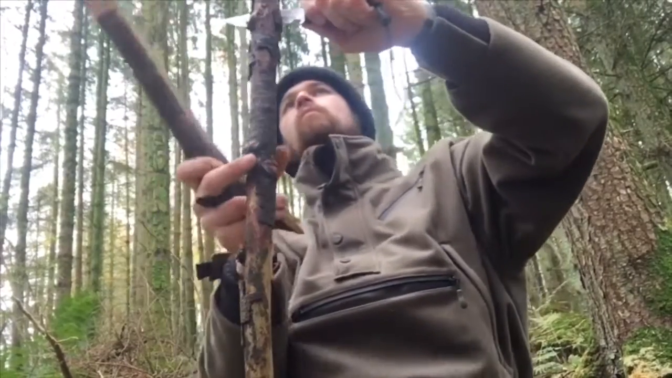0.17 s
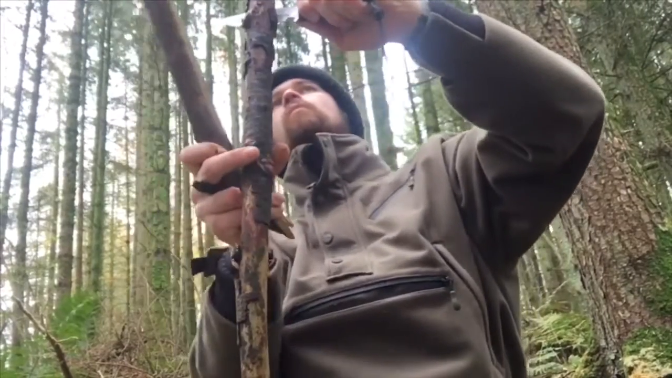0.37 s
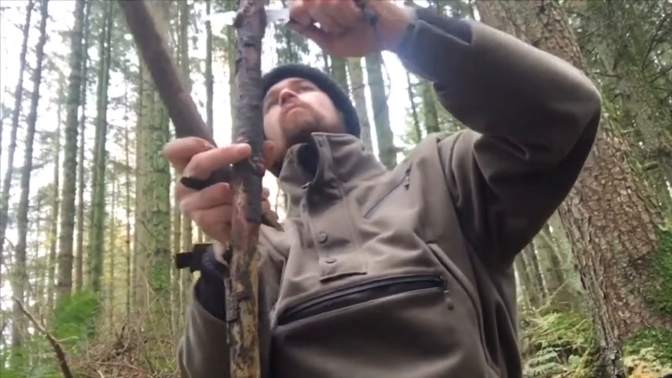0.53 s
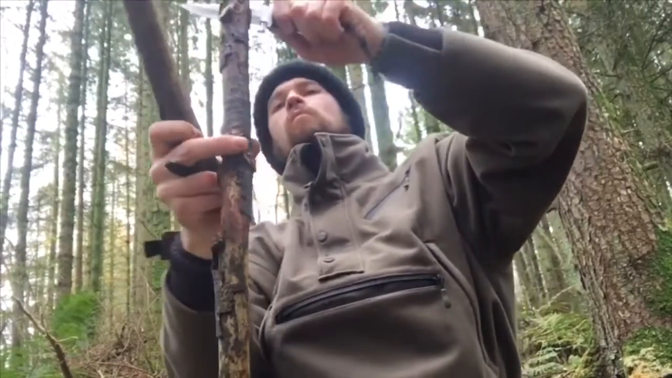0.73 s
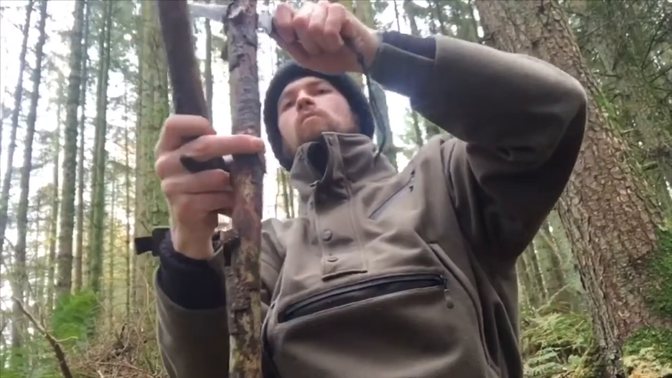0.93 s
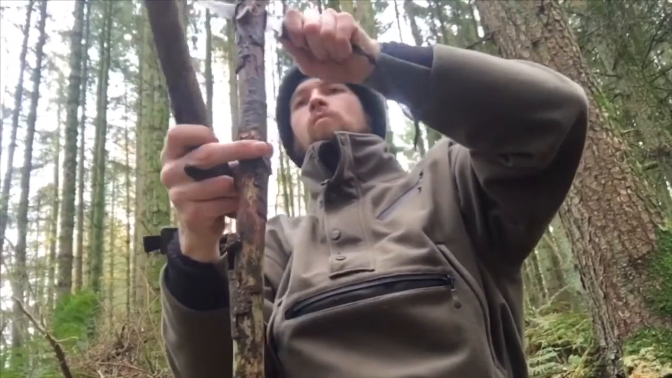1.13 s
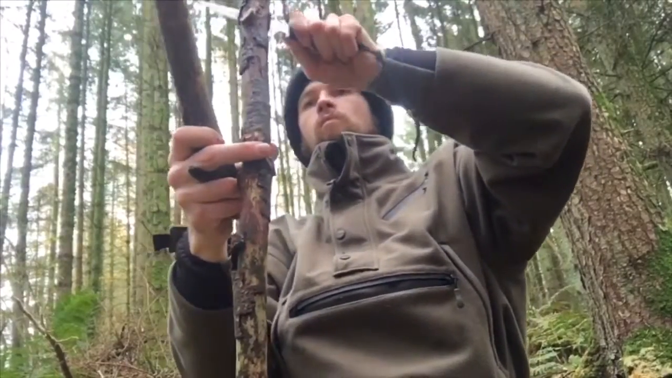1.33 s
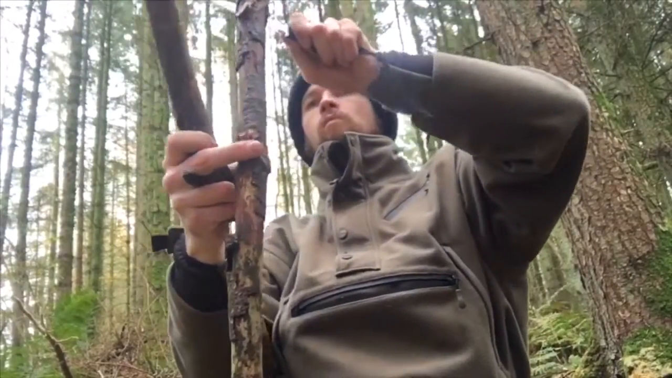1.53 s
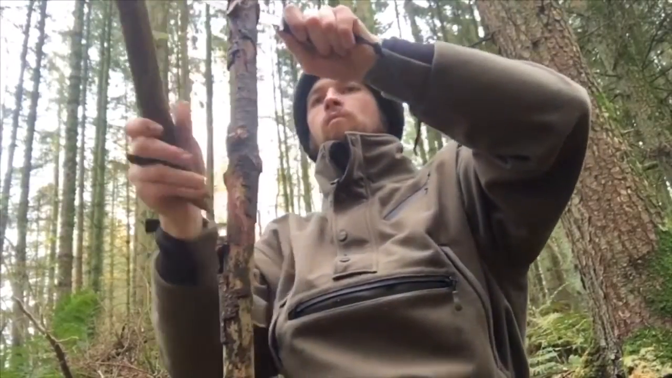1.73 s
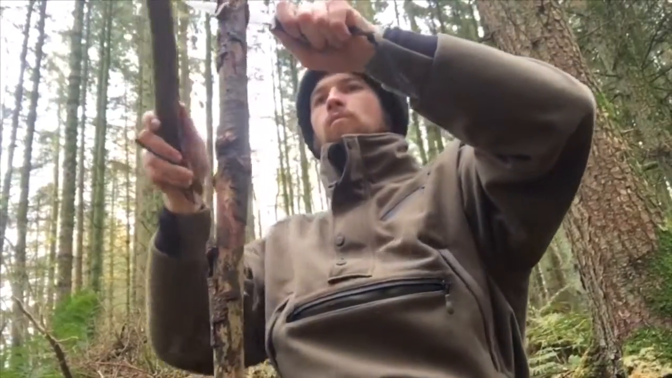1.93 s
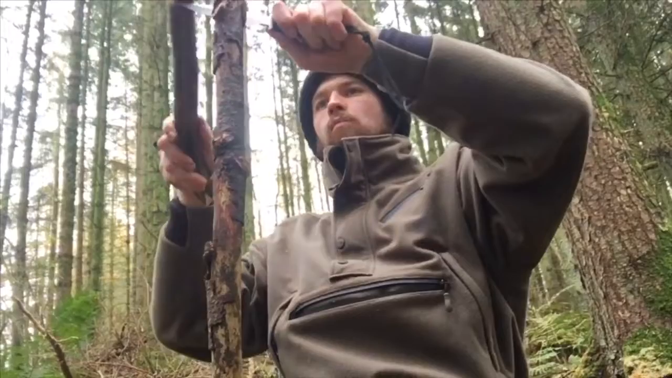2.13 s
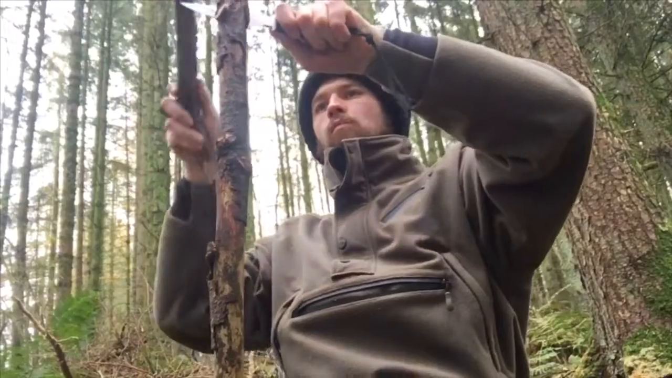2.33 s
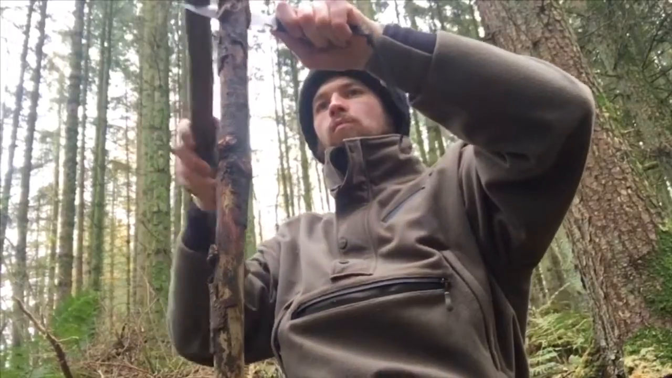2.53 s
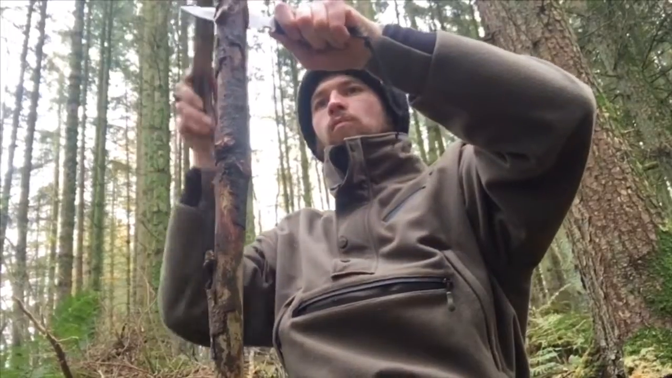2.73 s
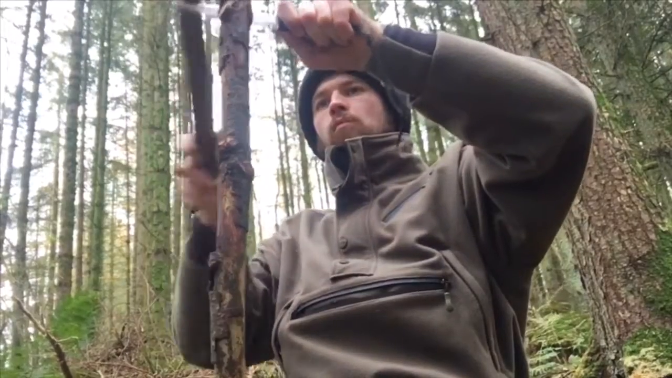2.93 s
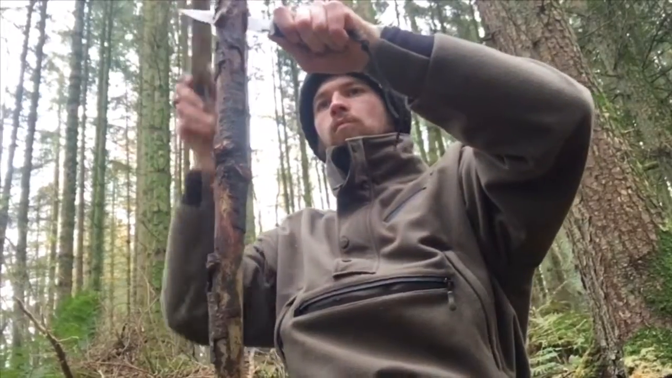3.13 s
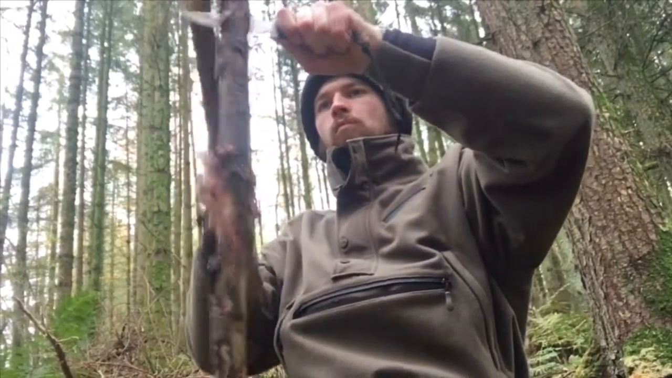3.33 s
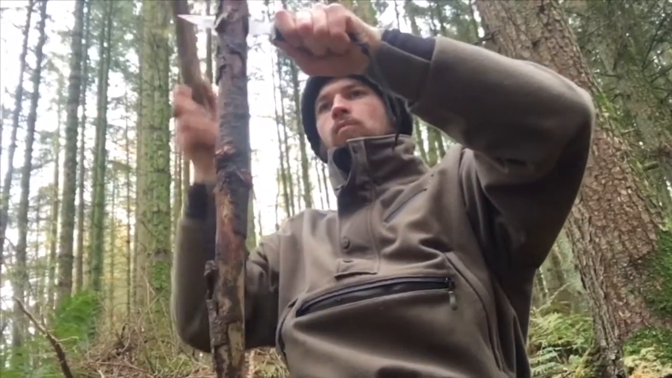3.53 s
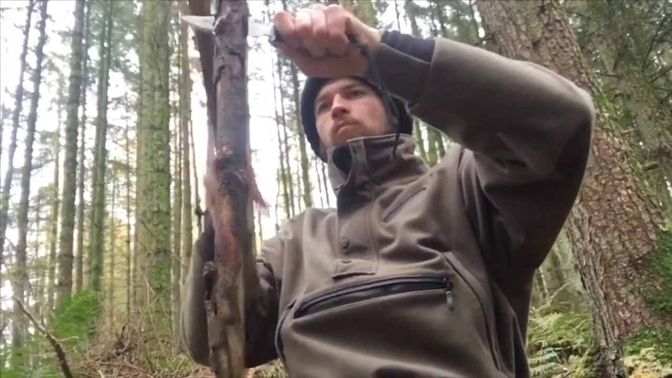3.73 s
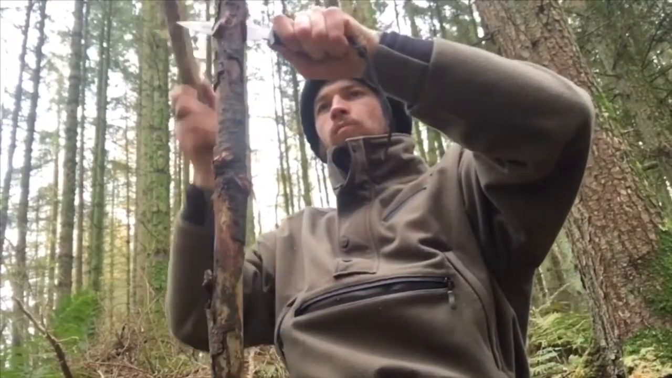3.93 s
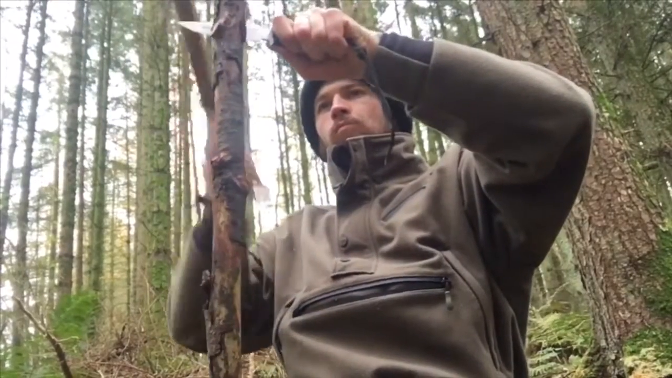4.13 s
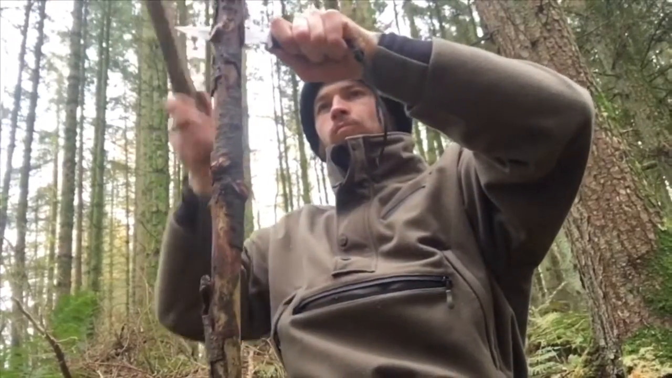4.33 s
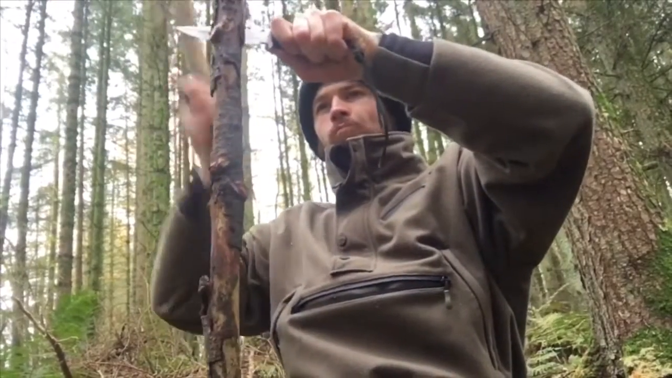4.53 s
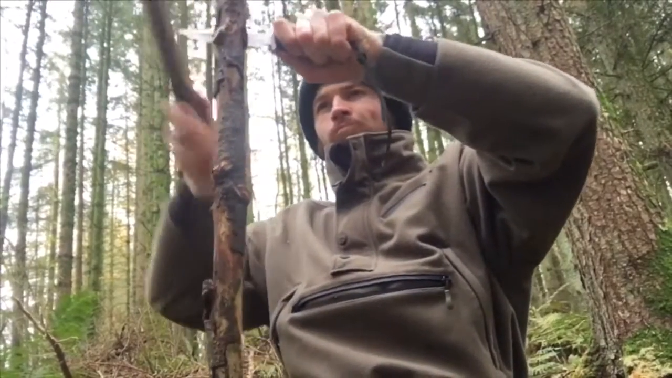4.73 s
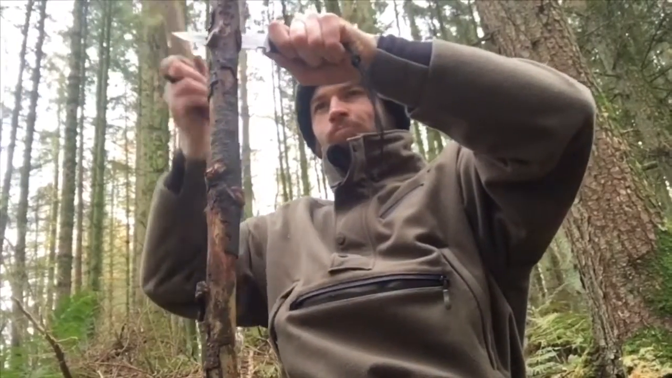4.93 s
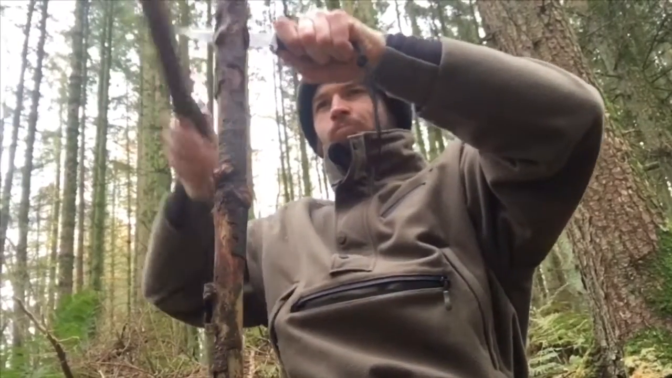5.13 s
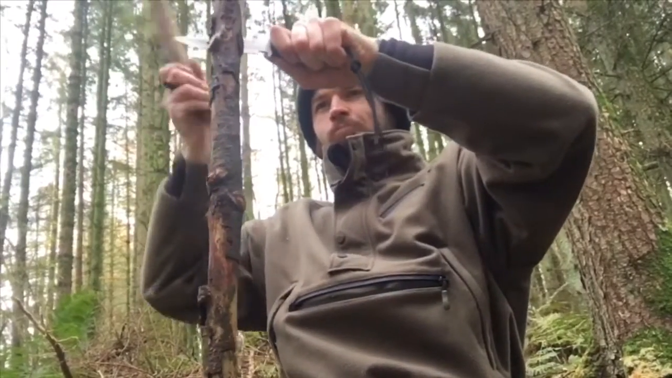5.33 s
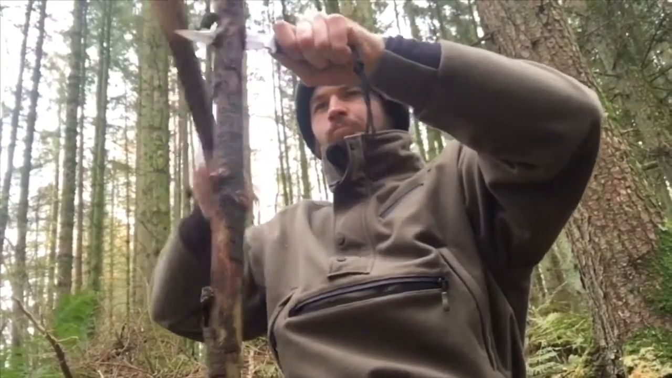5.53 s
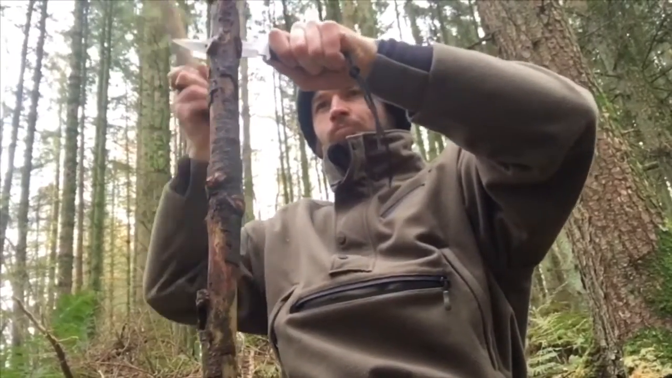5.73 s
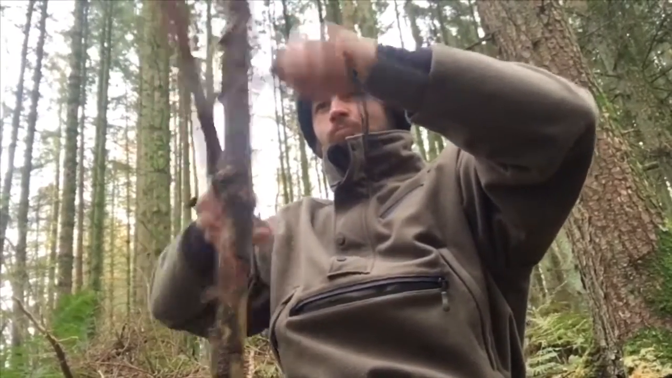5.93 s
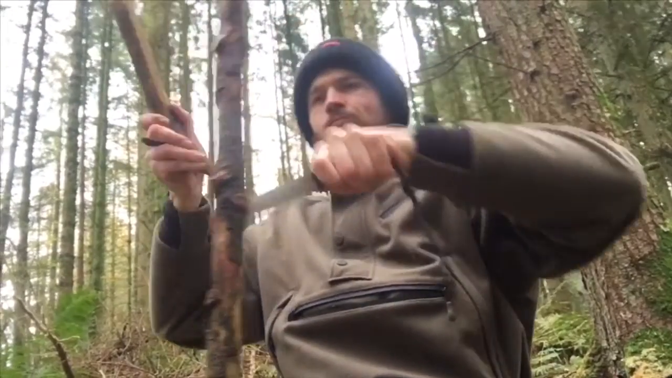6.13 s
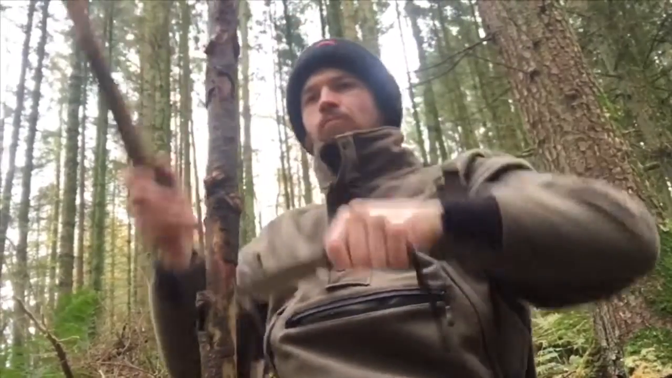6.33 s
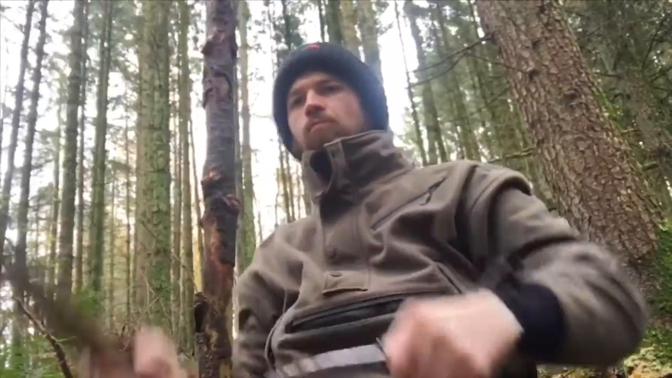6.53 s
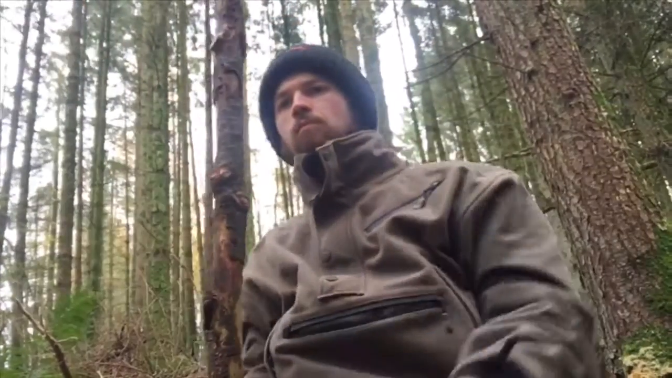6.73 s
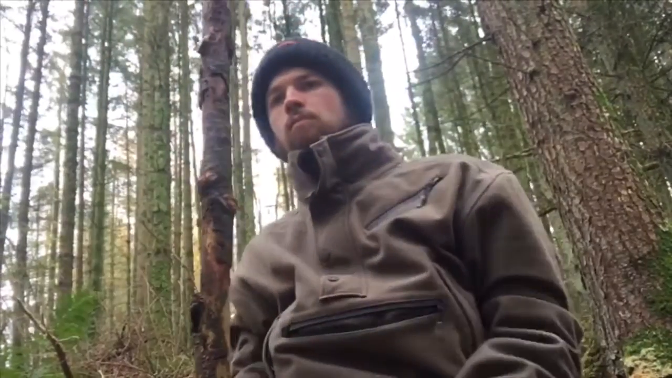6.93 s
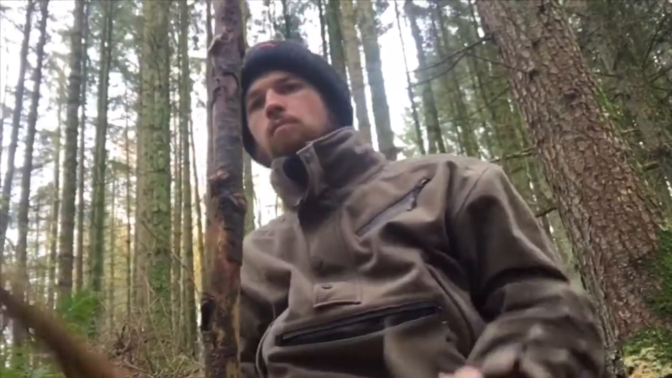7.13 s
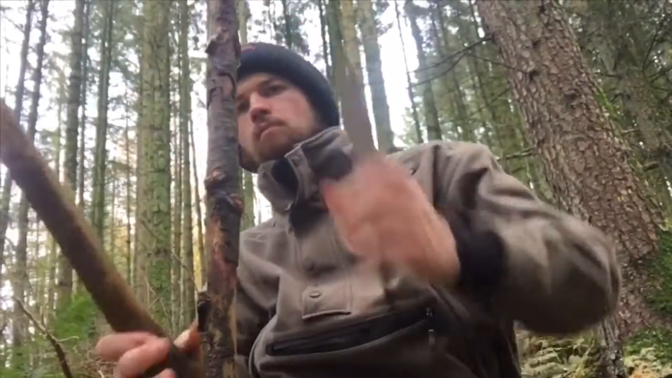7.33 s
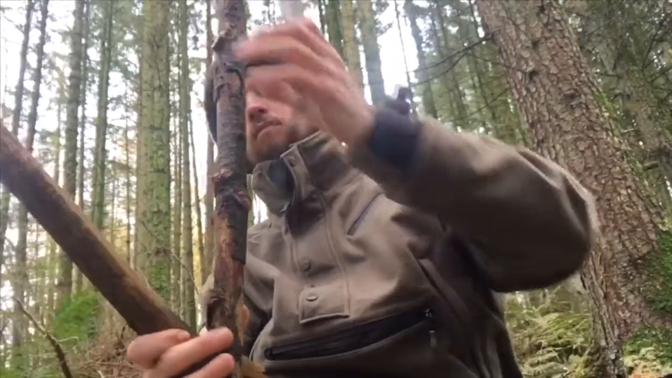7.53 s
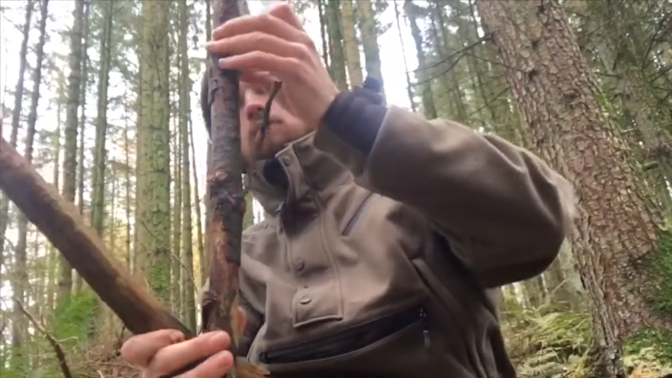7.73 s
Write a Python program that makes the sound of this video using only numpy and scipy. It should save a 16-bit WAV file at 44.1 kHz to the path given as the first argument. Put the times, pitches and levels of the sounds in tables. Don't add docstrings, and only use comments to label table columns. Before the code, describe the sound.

A small microphone near the ground hears a baton striking a knife blade into a thin upright trunk. After two quiet seconds, a soft tap leads to firm, dry, woody blows roughly every 0.4 seconds, each with a short hollow ring, bright crack and brief crunchy scatter. Stray knocks and bark scuffs fill the gaps. The final blows splinter most, then only clothing, faint high bird notes and distant hiss remain.

```python
import sys
import numpy as np
from scipy import signal
from scipy.io import wavfile
from scipy.ndimage import uniform_filter1d

SR = 44100
rng = np.random.default_rng(int(sys.argv[2]) if len(sys.argv) > 2 else 0)


def nominal_scale(level):
    x = np.asarray(level, float) / 20
    return 10 ** x


def materialize(psi):
    bounded = np.clip(np.atleast_2d(psi).T, -1, 1)
    quanta = np.round(bounded * 32767).astype(np.int16)
    wavfile.write(sys.argv[1], SR, quanta)


N = 343152


def at_hz(points, hz):
    points = np.array(points)
    return np.interp(np.log(hz), np.log(points[:, 0]), points[:, 1])


def rms_one(x):
    return x / np.sqrt(np.mean(x ** 2) + 1e-20)


def clicks(times, sizes):
    out = np.full(N, 1e-18)
    np.add.at(out, (np.asarray(times) * SR).astype(int), sizes)
    return out


def ring(x, hz, t60):
    r = nominal_scale(-60 / (max(t60, .002) * SR))
    w = 2 * np.pi * hz / SR
    return signal.lfilter([0, np.sin(w)], [1, -2 * r * np.cos(w), r * r], x)


def fade(x, t60):
    return signal.lfilter([1], [1, -nominal_scale(-60 / (t60 * SR))], x)


def band(x, low_hz, high_hz, order=2):
    edges_hz = [low_hz, min(high_hz, .45 * SR)]
    return signal.sosfilt(signal.butter(order, edges_hz, "band", fs=SR, output="sos"), x)


def drift(rate):
    r = np.exp(-80 * np.pi * rate / SR)
    slow = signal.lfilter([1], [1, -2 * r, r * r], rng.standard_normal(N // 40 + 2002))[2000:]
    return np.interp(np.arange(N) / 40, np.arange(len(slow)), rms_one(slow))


def noise_bands(spectrum):
    edges = 50 * 2 ** np.arange(0, 8.5, 1 / 3)
    white = rng.standard_normal((2, N))
    centres = np.sqrt(edges[1:] * edges[:-1])
    bands = [nominal_scale(at_hz(spectrum, hz)) * band(white[k % 2], edges[k], edges[k + 1])
             for k, hz in enumerate(centres)]
    return centres, np.array(bands) / np.std(sum(bands))


def add(out, s, sound):
    at = int(s * SR)
    out[at:at + len(sound)] += sound


def contact(spread_s, count, chatter=0.72):
    when, size = np.transpose(rng.random((count, 2)))
    return clicks(np.r_[0, spread_s * when], np.r_[1., chatter * (size - .5)])[:SR // 6]


def mode(hit, hz, t60):
    return band(ring(hit, hz, t60), hz / 2.0, hz * 2.5, order=1)


MODE_SPREAD_DB, MODE_SPREAD = 2.5, 0.0095


def struck(hit, modes):
    luck = rng.standard_normal((len(modes), 2))
    out = 0
    for i, (hz, db, t60) in enumerate(modes):
        level = nominal_scale(db + MODE_SPREAD_DB * luck[i, 0])
        out = out + (-1) ** i * level * mode(hit, hz * (1 + MODE_SPREAD * luck[i, 1]), t60)
    return out


def choke(after_s):
    late = (np.arange(SR // 6) / SR - after_s) / 0.0016
    return nominal_scale(-7 / (1 + np.exp(-np.clip(late, -40, 40))))


def splinters(times, level_db, t60):
    return rms_one(band(rng.standard_normal(N), 5500, 15800)) * fade(clicks(times, nominal_scale(level_db)), t60)


# t/s, then level/dB of the knock, bite, thump and splinters
BLOWS = [
    (2.1273, -25.5, -23.5, -38.5, -54),
    (2.54, -14.5, -6, -25, -60),
    (2.9456, -17, -7.5, -20, -29),
    (3.3647, -14, -4, -19, -36.5),
    (3.775, -10, -8, -18.5, -22.5),
    (4.194, -7, -10.5, -17.5, -30),
    (4.6359, -5.5, -7, -17, -26),
    (5.0658, -5.5, -8.5, -18.5, -22.5),
    (5.498, -4.5, -8.5, -17, -16.5),
    (5.9456, -4.5, -7.5, -26.5, -13.5),
]
# f/Hz, level/dB, t60/s
THUMP = [(198, -9, 0.049), (264.1, 5.5, 0.02)]
# multiple of KNOCK_HZ, level/dB, t60/s
KNOCK = [(1.03, 3.5, 0.018), (.8, -7.5, 0.0093), (1.17, -5.5, 0.048), (.69, -8, 0.022)]
# multiple of the two bite notes, level/dB, t60/s
BITE = [(1.0, -1.8, 0.019), (1.0, 1.63, 0.0037)]
# multiple of the crack note, level/dB, t60/s
CRACK = [(1.001, 2, 0.013), (.87, -0.5, 0.012), (1.19, -3.5, 0.012), (1.332, -9, 0.011), (1.52, -5.5, .014),
         (1.829, 2, 0.0039)]
KNOCK_HZ = 1063
# bite f/Hz, upper bite f/Hz, crack f/Hz
LOOSE_HZ, SEATED_HZ, SEATED_S = (1490, 2100, 2790), (1575, 2040, 3000), 3.6
HOLLOW_HZ, HOLLOW_T60_S = 560, .028
HOLLOW_DB, HOLLOW_PER_THUMP = 19.5, 2.183
CRACK_DB, CRACK_PER_SPLINTER = -1.5, 0.25
BITE_SOFT_HZ, BITE_LAG_S = 3460, .00072
STEEL_FEELS = .3
BLOW_CHATTER = .45


def blows():
    out, soft = np.zeros(N), signal.butter(1, BITE_SOFT_HZ, fs=SR)
    for s, knock_db, bite_db, thump_db, splinter_db in BLOWS:
        *bite_hz, crack_hz = SEATED_HZ if s > SEATED_S else LOOSE_HZ
        crack_db = bite_db + CRACK_DB + CRACK_PER_SPLINTER * splinter_db
        land = 0.52 * contact(.001, count=2, chatter=BLOW_CHATTER)
        push = signal.lfilter(*soft, contact(0.0033, count=3, chatter=BLOW_CHATTER))
        bite = 0.6 * np.roll(push, int(BITE_LAG_S * SR))
        wood = [(HOLLOW_HZ, HOLLOW_DB + HOLLOW_PER_THUMP * thump_db + 6.5, HOLLOW_T60_S)]
        wood += [(k * KNOCK_HZ, knock_db + db + 1.0, t60) for k, db, t60 in KNOCK]
        steel = [(k * hz, bite_db + db + 5.0, t60) for hz, (k, db, t60) in zip(bite_hz, BITE)]
        steel += [(k * crack_hz, crack_db + db + 5.0, t60) for k, db, t60 in CRACK]
        upper = struck(land - bite, wood) - struck(land - STEEL_FEELS * bite, steel)
        thud = sum(nominal_scale(thump_db + db + 7.5) * mode(land - bite, hz, t60) for hz, db, t60 in THUMP)
        add(out, s - .0011, upper * choke(0.0062) + band(thud, 105, 8800))
    s, *_, splinter_db = np.transpose(BLOWS)
    snap = splinters(s + 0.00018, splinter_db + 0.5, t60=0.0031)
    tail = splinters(s, splinter_db - 16.5, t60=0.025)
    return out + snap + tail


CRUSH_DB, CRUSH_T60_S = -2, 0.014


def crush():
    s, _, bite_db, _, splinter_db = np.transpose(BLOWS)
    level_db = bite_db + CRUSH_DB + CRACK_PER_SPLINTER * splinter_db
    burst = fade(clicks(s, nominal_scale(level_db)), CRUSH_T60_S)
    return band(rng.standard_normal(N) * burst, 1000, 4200, order=3) * 2.9


# t/s, ground shudder level/dB, crunch level/dB, dullness/dB
AFTER = [(2.126, -57, -72, 22.5), (2.537, -44, -48.5, 15), (2.943, -42.5, -46, 13.5),
         (3.129, -38, -52.5, 16.5), (3.366, -41, -42, 20.5), (3.773, -45, -42.5, 14),
         (4.193, -47.5, -42, 23.5), (4.634, -38, -41.5, 17), (4.942, -41.5, -49, 42),
         (5.066, -35, -39.5, 23), (5.498, -40, -39, 22), (5.946, -47, -42.5, 12)]
# f/Hz, level/dB per Hz
SCATTER = [(100, -4.5), (300, 1), (1000, 4), (2500, 1), (6000, -1), (16000, -6.5)]
# f/Hz, t60/s
SCATTER_T60 = [(100, 0.22), (400, 0.17), (1500, 0.26), (5000, 0.11), (16000, 0.12)]
CRUNCH_HZ = (500, 2500, 10000)
MIDDLE_DB, MIDDLE_SHARE = 6.5, .75
SHUDDER_HZ, SHUDDER_T60_S = 86, .35
GRAIN_DB = 3.5


def aftermath():
    s, shudder_db, crunch_db, dull_db = np.transpose(AFTER)
    out = mode(clicks(s, nominal_scale(shudder_db)), SHUDDER_HZ, SHUDDER_T60_S)
    grain = nominal_scale(GRAIN_DB * drift(90))
    middle_db = crunch_db + MIDDLE_DB - MIDDLE_SHARE * dull_db
    colours = np.transpose([crunch_db, middle_db, crunch_db - dull_db])
    for hz, noise in zip(*noise_bands(SCATTER)):
        level_db = np.array([at_hz(list(zip(CRUNCH_HZ, row)), hz) for row in colours])
        out += noise * grain * fade(clicks(s + 0.0019, nominal_scale(level_db + 6.5)), at_hz(SCATTER_T60, hz))
    return out


LINGER_DB, LINGER_S, LINGER_FALL_DB_S = -19, 0.063, 60


def linger():
    t = np.arange(0, N, 40) / SR
    level = 0
    for s, _, crunch_db, dull_db in AFTER:
        fall_db = LINGER_FALL_DB_S * np.abs(t - s)
        gate = (t > s) * np.clip((s + LINGER_S - t) / .006, 0, 1)
        level = level + nominal_scale(crunch_db - .5 * dull_db + LINGER_DB - fall_db) * gate
    wash = rms_one(band(rng.standard_normal(N), 3500, 15800))
    return np.interp(np.arange(N) / SR, t, level) * wash


# f/Hz, level/dB, t60/s
CLAP = [(307, -24, 0.011), (548, -16, 0.017), (703, -11, 0.028), (874, -6, 0.018), (1112, -13.5, .03),
        (1620, -10, 0.014), (2300, -8, .003)]
CLAP_S, CLAP_SOFT_HZ = 3.1327, 2400


def clap():
    soft = signal.butter(3, CLAP_SOFT_HZ, fs=SR, output="sos")
    hit = signal.sosfilt(soft, contact(.001, count=2, chatter=.1))
    tone = sum((-1) ** i * nominal_scale(db) * mode(hit, hz, t60) for i, (hz, db, t60) in enumerate(CLAP))
    out = np.zeros(N)
    add(out, CLAP_S, -nominal_scale(8.5) * choke(0.0073) * tone)
    return out


# t/s, peak level/dB, main f/Hz, t60/s, upper ring level/dB
KNOCKS = [(0.157, -60, 283, 0.04, -18), (3.006, -48.5, 1115, 0.021, -11), (3.336, -37, 494, 0.025, -7),
          (3.454, -45.5, 505, 0.051, -11), (3.651, -51, 524, 0.19, -22), (3.677, -42.5, 397, 0.035, -26),
          (3.821, -51, 414, 0.05, -3.5), (4.896, -51.5, 438, 0.022, -14), (4.941, -25.5, 546, 0.068, -9.5),
          (5.103, -31, 302, 0.011, 4.5), (5.124, -34.5, 340, 0.0062, -7), (5.165, -42, 805, 0.038, 3.5),
          (5.306, -53, 687, 0.015, -8), (5.385, -35.5, 814, 0.015, 8), (5.717, -25, 1156, 0.016, 9),
          (5.863, -52, 425, 0.022, -17.5), (6.179, -41, 321.4, 0.034, -13)]
# multiple of its main note, level/dB
OVERTONES = [(1.0, 8.5), (1.25, -0.5), (.78, -6.5), (1.55, -8)]
# t/s, peak level/dB
SWAY = [
    (3.336, -32),
    (3.681, -35),
    (4.946, -32),
    (5.1, -43.5),
    (5.384, -46.5),
]
SWAY_HZ = 187
CLICK_UNDER_DB, CLICK_TOP_DB = 9, -12
PADDED_DB, PADDED_HZ = -12, 360


def knocks():
    out = np.zeros(N)
    for s, peak_db, hz, t60, upper_db in KNOCKS:
        click_db = min(upper_db + CLICK_UNDER_DB, CLICK_TOP_DB) + PADDED_DB * (hz < PADDED_HZ)
        hit = contact(3.09 / hz, count=4)
        note = sum(nominal_scale(db) * mode(hit, hz * k, t60) for k, db in OVERTONES)
        note -= nominal_scale(upper_db + 1.5) * (mode(hit, 1383, 0.55 * t60) - 0.65 * mode(hit, 2000, 0.17 * t60))
        note += nominal_scale(click_db + 4.0) * (mode(hit, 3400, .003) - .4 * mode(hit, 6500, .002))
        add(out, s, nominal_scale(peak_db) * note * choke(5.8 / hz))
    s, peak_db = np.transpose(SWAY)
    return out + mode(clicks(s, nominal_scale(peak_db - 7.0)), SWAY_HZ, .4)


# t/s, peak level/dB
GRAZES = [
    (2.9394, -10),
    (3.124, -48),
    (3.158, -41),
    (3.110, -39.5),
    (4.612, -38.5),
    (4.626, -61),
    (5.044, -48.5),
    (5.474, -40.5),
    (5.922, -43.5),
    (5.938, -50.5),
]


def grazes():
    out = np.zeros(N)
    for s, peak_db in GRAZES:
        hit = contact(0.0077, count=6)
        scuff = mode(hit, 1400, 0.0074) - .7 * mode(hit, 1600, 0.0059) + 0.77 * mode(hit, 2400, .006)
        add(out, s, nominal_scale(peak_db) * scuff)
    return out


# t/s, peak level/dB, f/Hz, splinter level/dB
TICKS = [(3.333, -47, 1900, -14), (3.343, -49, 2300, -3), (3.463, -53, 4100, -16), (3.723, -59, 6460, -14),
         (2.534, -35, 2000, -41), (4.144, -50.5, 3600, -18), (5.073, -30, 4200, -13),
         (5.084, -37, 3260, -25), (5.474, -54, 4900, -16), (5.717, -33, 3140, -15), (4.94, -31, 2000, -36),
         (6.009, -49, 3940, -22), (6.024, -33, 2400, -34), (6.053, -34.5, 1700, -29),
         (6.199, -50.5, 3400, -11.5), (6.379, -56.5, 5120, -6), (7.219, -61, 1483, -7)]
SNAP_DB = -13.5


def ticks():
    out = np.zeros(N)
    for s, peak_db, hz, splinter_db in TICKS:
        hit = contact(0.003, count=2)
        tone = mode(hit, hz, 0.0087) - 0.5 * mode(hit, 1.676 * hz, .004)
        tone += 0.58 * mode(hit, 0.48 * hz, 0.0066)
        snap = nominal_scale(SNAP_DB) * band(hit, 1200, 9000, order=1) * 4
        add(out, s, nominal_scale(peak_db) * (tone + snap))
    s, peak_db, hz, splinter_db = np.transpose(TICKS)
    return out + splinters(s, peak_db + splinter_db, t60=0.01)


# delay t/s, level/dB
ECHOES = [
    (.0095, -26),
    (.0205, -39.5),
]


def trees(x):
    return sum(nominal_scale(db) * np.roll(x, int(s * SR)) for s, db in ECHOES)


# f/Hz, level/dB per Hz
CLOTH = [(400, 1), (1500, 4.5), (4000, -2), (9000, -12), (12000, -18.5), (16000, -22)]
# middle t/s, peak level/dB, half length/s
RUSTLES = [
    (.35, -75, .4),
    (0.79, -75, 0.12),
    (6.6, -73, .2),
    (6.802, -68, 0.045),
    (6.96, -63.5, 0.062),
    (7.12, -68.5, 0.06),
    (7.352, -83, 0.38),
]


def jacket():
    t = np.arange(N) / SR
    level = sum(nominal_scale(db) * np.exp(-.5 * ((t - s) / half_s) ** 2) for s, db, half_s in RUSTLES)
    grain = nominal_scale(-2.0 + 2.0 * drift(40))
    return level * grain * noise_bands(CLOTH)[1].sum(axis=0)


# t/s, peak level/dB
PUFFS = [(0.0, -46), (.19, -48), (.32, -42.5), (.48, -53), (.58, -57), (.71, -55), (.88, -54), (1.1, -65),
         (1.21, -48), (1.82, -63), (2.32, -54), (2.75, -57.5), (3.53, -53), (3.63, -48.5), (3.719, -47.5),
         (3.871, -59.5), (4.07, -55), (4.331, -46.5), (4.75, -55), (5.031, -46.5), (5.179, -56),
         (5.74, -48)]
PUFF_RISE_DB_S, PUFF_FALL_DB_S, CALM_DB = 170, 141, -60
JOLT_DB, JOLT_LAG_S, JOLT_FALL_DB_S = -0.5, 0.019, 198.5


def wind():
    low = band(rng.standard_normal(N), 38, 70)
    even = low / np.sqrt(uniform_filter1d(low ** 2, size=3000) + 1e-9)
    t = np.arange(0, N, 40) / SR
    level = nominal_scale(CALM_DB)
    for s, db in PUFFS:
        level = level + nominal_scale(db - np.maximum(PUFF_RISE_DB_S * (s - t), PUFF_FALL_DB_S * (t - s)))
    for s, _, crunch_db, _ in AFTER:
        since = t - s - JOLT_LAG_S
        level = level + nominal_scale(crunch_db + JOLT_DB - np.maximum(-600 * since, JOLT_FALL_DB_S * since))
    return nominal_scale(-3.5) * np.interp(np.arange(N) / SR, t, level) * even


# start t/s, length/s, first f/Hz, last f/Hz, level/dB
BIRD = [
    (4.531, .075, 5050, 4900, -82.5),
    (6.084, .11, 8520, 8850, -72),
    (6.239, .11, 8400, 9150, -73),
]
BIRD_EDGE_S = 0.011


def bird():
    out, t = np.zeros(N), np.arange(N) / SR
    blur = rms_one(signal.lfilter([1], [1, -.965], rng.standard_normal(N)))
    for s, length_s, first_hz, last_hz, db in BIRD:
        glide_hz = np.interp(t, [s, s + length_s], [first_hz, last_hz])
        phase = 2 * np.pi * np.cumsum(glide_hz) / SR
        swell = np.clip(np.minimum(t - s, s + length_s - t) / BIRD_EDGE_S, 0, 1)
        out += nominal_scale(db - 3.0) * swell * blur * np.sin(phase)
    return out


# f/Hz, level/dB
WOOD = [(41, -32.5), (70, -5.5), (92, -8), (280, -16), (400, -19.5), (870, -16), (1250, -16.5),
        (1500, -23.5), (2200, -25.5), (4000, -32), (7000, -42), (10000, -46.5), (14600, -51.5),
        (16000, -68)]
WOOD_DB = -60.5


def woodland():
    together = drift(0.091)
    hiss = sum(noise * nominal_scale(.5 * together + 0.79 * drift(12.0)) for noise in noise_bands(WOOD)[1])
    return nominal_scale(WOOD_DB) * hiss


def scene():
    near = blows() + clap() + knocks() + grazes() + ticks()
    after = crush() + aftermath() + linger()
    background = jacket() + wind() + bird() + woodland()
    return (near + trees(near) + after + background)[None]


def roll_off(x):
    return signal.sosfilt(signal.butter(12, 17050, fs=SR, output="sos"), x)


def record(dry):
    heard = signal.sosfilt(signal.butter(2, 35, "high", fs=SR, output="sos"), dry)
    port_hz, width_hz, share = 4800, 400, 0.6
    heard = heard - share * band(heard, port_hz - width_hz / 2, port_hz + width_hz / 2, order=1)
    rounded = 2.183 * np.tanh(heard / 2.57)
    mix = signal.sosfilt(signal.cheby2(10, 60, 17000, fs=SR, output="sos"), rounded)
    return roll_off(mix)


dry = scene()
out = record(dry)
materialize(out)
```